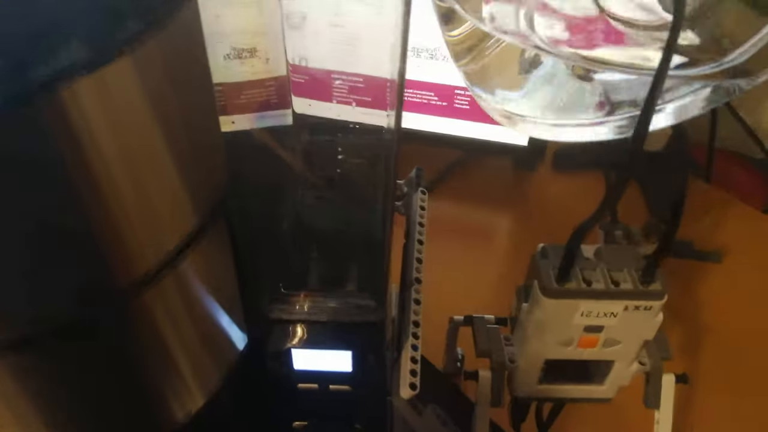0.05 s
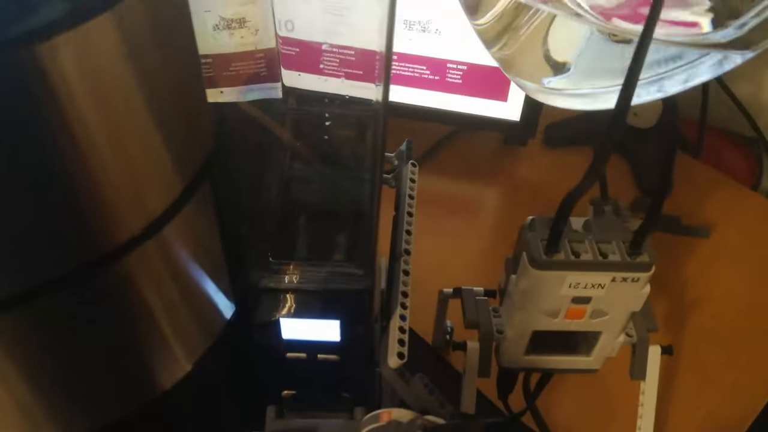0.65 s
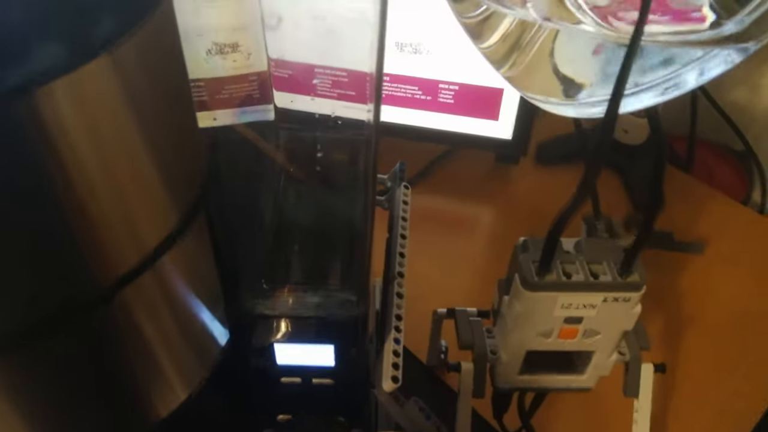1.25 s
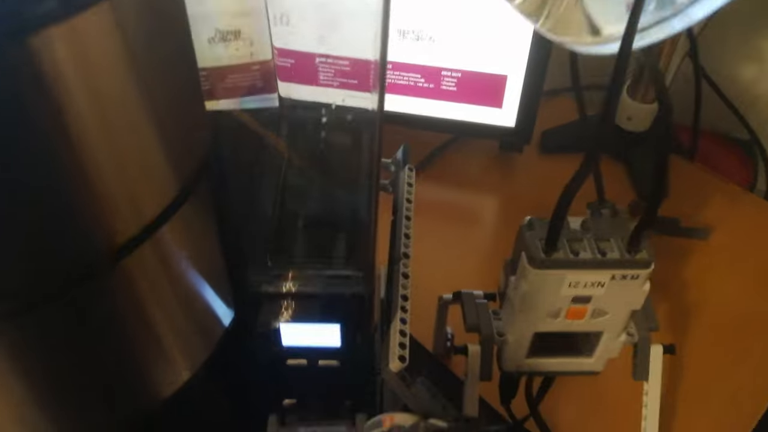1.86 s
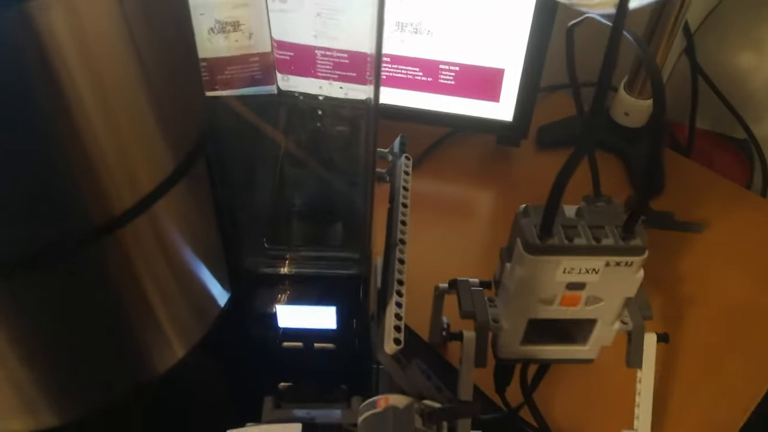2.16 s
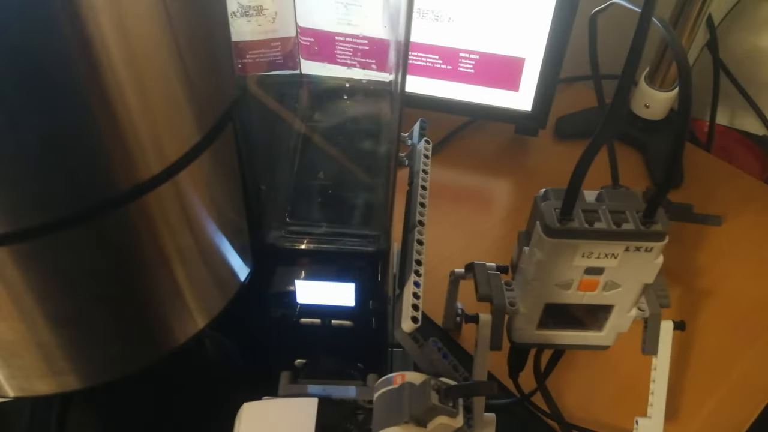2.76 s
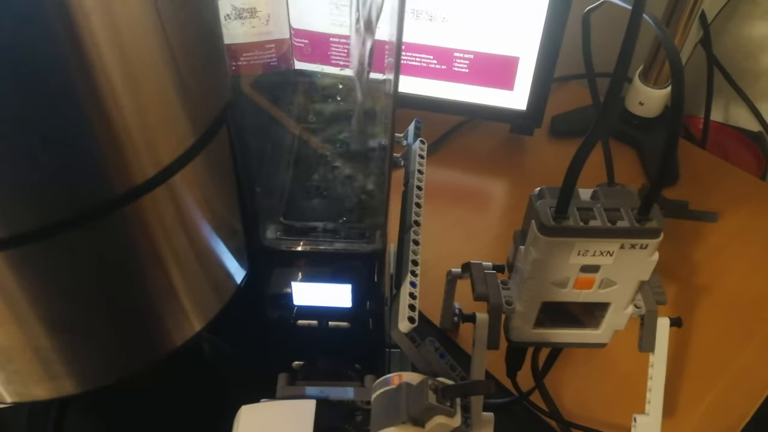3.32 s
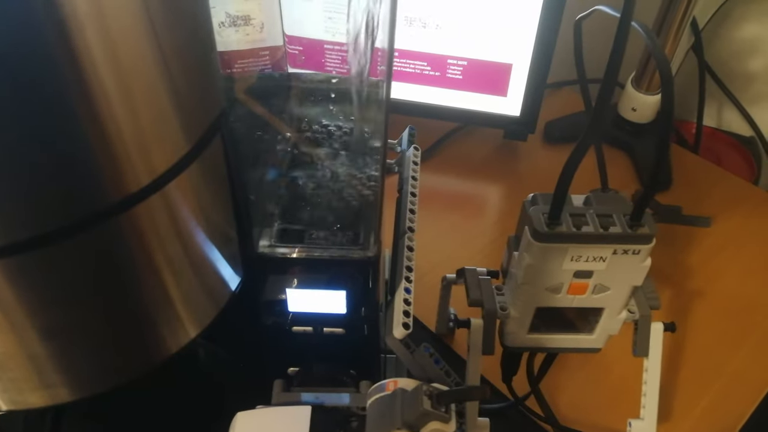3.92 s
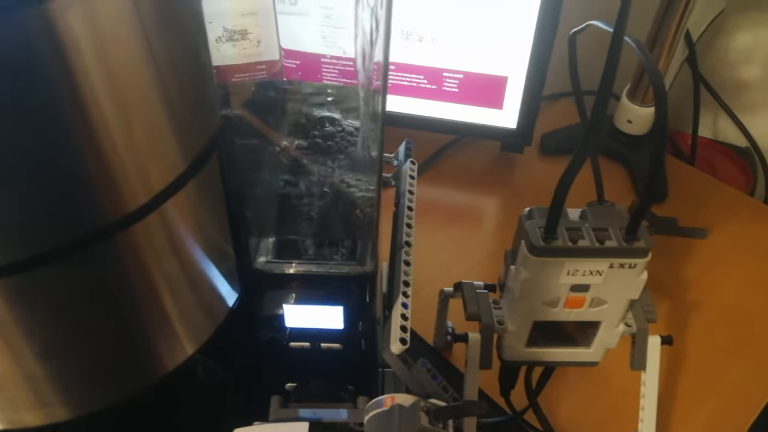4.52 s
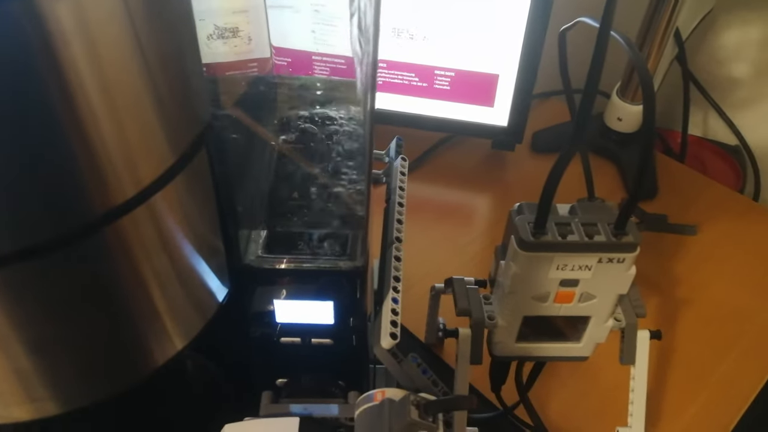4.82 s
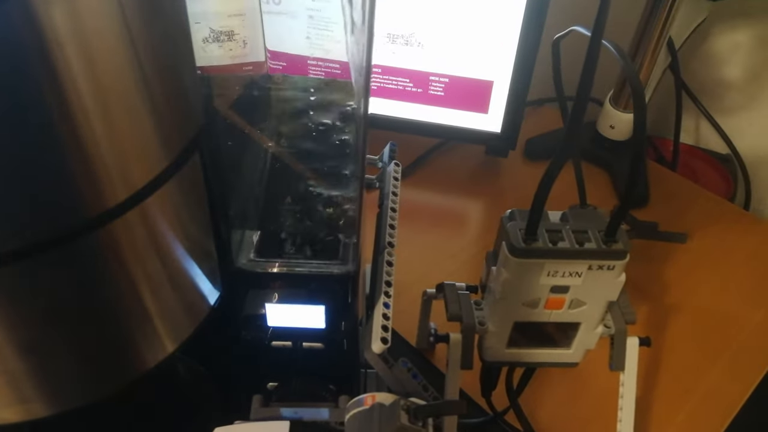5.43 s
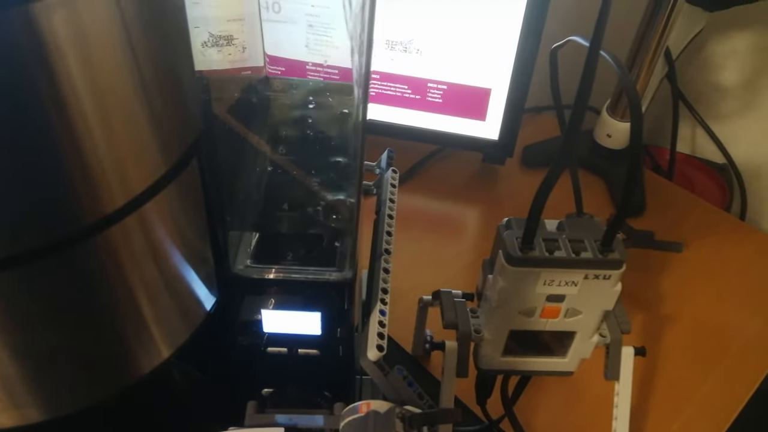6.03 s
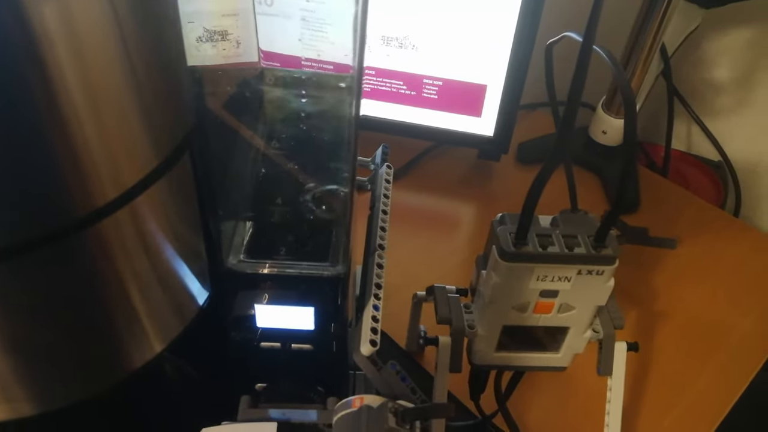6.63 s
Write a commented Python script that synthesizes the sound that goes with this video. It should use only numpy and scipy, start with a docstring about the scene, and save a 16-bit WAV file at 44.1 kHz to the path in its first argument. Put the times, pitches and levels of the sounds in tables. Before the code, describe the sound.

After two hollow knocks, a stream of water splashes into a plastic tank and thins to bubbling drips in a humming room.

```python
"""A stream of water pours into a tall plastic tank on a desk and weakens to gurgles and trickles.
It drags air under, and the bubbles ring inside the tank, a little right of the microphone: big ones
low, small ones high. Before the pour, a jug knocks twice on the tank, there are soft handling bumps
and a brief hiss, and a few drops fall in. Later, foam bursts on the water with tiny clicks.
All along the room hums, and something ticks faintly and evenly."""
import sys
import numpy as np
from scipy import signal
from scipy.fft import rfft, irfft, next_fast_len
from scipy.io import wavfile
from scipy.ndimage import uniform_filter1d, map_coordinates

SR = 44100
rng = np.random.default_rng(int(sys.argv[2]) if len(sys.argv) > 2 else 0)


def store_wav(level_fs):
    """Save 16-bit WAV to argv[1]."""
    pcm = np.round(np.clip(np.atleast_2d(level_fs), -1, 1) * 32767)
    wavfile.write(sys.argv[1], SR, pcm.T.astype(np.int16))


N = 294588

# Levels in the tables are relative. A "colour" says how strong the low and high pitches are.
# A "fade" is the time a sound takes to drop by 60 dB.
# colour of the room's noise: f/Hz, level/dB
ROOM_COLOUR = [(20, 3), (50, -5), (100, -3.5), (170, -3.5), (230, 1), (290, -1.5), (370, -9.5), (520, -9),
               (650, -14), (950, -12.5), (1150, -9.5), (1500, -16), (4500, -18), (8500, -21),
               (11500, -25.5), (15500, -25)]
# how alike that noise is left and right: f/Hz, likeness (1 = the same)
ROOM_LIKENESS = [(60, 0.8), (180, 1), (550, -0.29), (1650, 0.12), (4970, -0.17), (15000, 0.012)]
# tones of the hum: f/Hz, level/dB
HUM_TONES = [(290.7, -77), (737.5, -92.5), (1168, -89)]
# colour of the even ticks: f/Hz, level/dB
TICK_COLOUR = [(4000, -58), (7500, -3), (10000, -5.5), (11500, -17), (15000, -16)]
# the jug hits the tank: t/s, level/dB
KNOCKS = [(0.1273, -32.5), (0.4954, -34.5)]
# tones of the struck tank: f/Hz, width/Hz, level/dB
TANK_TONES = [(242.6, 19.6, -2.5), (491, 44, -9), (819, 69, -16), (1228, 56, -20), (1370, 110, -13.5),
              (1678, 26, -25), (1932, 110, -21), (1974, 9.5, -32), (2460, 21, -28), (2750, 16, -30),
              (2880, 220, -27), (3200, 46, -36), (3480, 44, -45), (3840, 11, -41), (4140, 40, -46)]
# colour of the clack as they touch: f/Hz, level/dB
CLACK_COLOUR = [(100, -44), (220, 1), (370, 3), (650, -17), (1230, -7), (2200, -12), (4000, -27.5),
                (6000, -39), (15000, -51)]
# the room's echo: f/Hz, fade/s
ROOM_FADE = [(200, 0.59), (1500, 0.36), (6000, 0.12), (14000, 0.21)]
# the hiss between the knocks: t/s, level/dB
HISS_LEVEL = [(0.22, -100), (0.29, -71), (0.37, -68.5), (0.45, -69), (0.49, -100)]
# its colour: f/Hz, level/dB
HISS_COLOUR = [(2000, -5), (3200, -5.5), (4000, 0.5), (5000, -5.5), (6200, 1.5), (7000, -4), (8500, 2),
               (11000, -6), (15000, -17)]
# soft handling bumps: t/s, level/dB, f/Hz, fade/s
BUMPS = [(0.4542, -13.5, 168, 0.0057), (0.46, -48, 84.5, .04), (0.92, -52.5, 155, 0.043),
         (1.678, -60, 110, 0.067), (2.019, -55, 140, .04), (2.083, -50, 128, 0.045),
         (4.198, -50, 98, 0.084), (4.479, -53.5, 97, 0.054), (4.895, -41, 116, 0.018)]
# what the desk and hand pass on: f/Hz, level/dB
BUMP_COLOUR = [(20, -34), (50, -10.5), (90, 2.5), (300, 3), (700, 6), (2000, -43), (8000, -70)]
# light handling taps: t/s, level/dB
TAPS = [(0.537, -58.5), (0.926, -61.5)]
# their colour: f/Hz, level/dB
TAP_COLOUR = [(500, 1), (1300, 6), (2500, -4), (4300, 5), (7000, -15), (15000, -22)]
# the clearest drops: t/s, level/dB, bubble f/Hz, splash boost/dB
CLEAR_DROPS = [(2.6446, -39.5, 7860, 8.5), (2.6734, -34.5, 2940, 1), (2.6947, -42, 9550, 0),
               (2.74, -44, 6800, -2), (2.798, -42.5, 7700, -5), (2.8306, -37.5, 9800, -8),
               (2.9066, -40.5, 5800, -4), (2.9336, -30.5, 4036, 7), (2.9611, -29, 6930, 0),
               (3.0088, -32, 4660, 5), (3.0595, -27.5, 4000, -7), (3.125, -26, 6650, -4),
               (3.3355, -27.5, 6850, -9), (3.4146, -32.5, 8000, 1.5), (3.5167, -24, 6590, -5),
               (3.683, -34, 6860, -1.5), (3.7492, -31.5, 6980, -4), (3.899, -33.5, 7350, -8),
               (4.376, -30.5, 8720, -16), (4.5438, -31, 8000, -2), (4.5855, -37.5, 2250, 7),
               (4.8044, -34, 7830, 9.5), (4.8563, -35.5, 3180, 5), (4.9075, -41, 8300, 8),
               (4.9887, -39, 2950, 4), (5.0609, -45.5, 3000, 7), (5.1058, -38.5, 5700, -14),
               (5.2468, -37.5, 5640, 2), (5.3, -37, 13200, -8), (5.3676, -50, 2890, -1),
               (5.447, -42, 7300, 1), (5.6573, -41.5, 6130, 7), (5.7633, -42.5, 3400, -1.5),
               (5.7774, -36, 2104, -8), (5.8391, -34.5, 2060, -8), (5.9484, -43, 7100, 7),
               (5.9803, -35, 3320, -3), (6.0235, -38.5, 5130, 0.5), (6.0977, -43, 5550, -8),
               (6.114, -38.5, 5500, 1.5), (6.1605, -39.5, 3190, -3), (6.2122, -38.5, 9970, 2),
               (6.2879, -38.5, 3320, 2), (6.339, -42.5, 5840, -6), (6.3593, -43, 4383, 0),
               (6.52, -49.5, 4600, -2)]
# echoes between the tank's walls: f/Hz, fade/s
WALL_FADE = [(200, 0.18), (2000, 0.048), (12000, 0.036)]
# strength of the pour, from full stream to trickle: t/s, strength/dB
POUR_STRENGTH = [(2.89, -78), (2.95, -50), (3.06, -42), (3.35, -46), (3.75, -46), (3.8, -54), (4.0, -55),
                 (4.29, -60), (4.41, -51), (4.53, -53), (4.6, -48), (4.76, -50), (4.93, -66), (5.25, -63),
                 (5.56, -76), (5.92, -72), (6.2, -68), (6.45, -79)]
# how big bubbles follow the pour: strength/dB, level/dB
GURGLE_LEVEL = [(-77, -75), (-66.5, -72.5), (-56.5, -62.5), (-44.5, -54.5)]
# how medium bubbles follow it: strength/dB, level/dB
BUBBLE_LEVEL = [(-79.5, -78), (-63.5, -67.5), (-54.5, -53.5), (-44, -45.5)]
# how small bubbles follow it: strength/dB, level/dB
PATTER_LEVEL = [(-80, -80), (-68, -63.5), (-58, -55), (-44, -51)]
# the fine spray: t/s, level/dB
SPRAY_LEVEL = [(2.915, -62), (2.94, -48), (3.06, -54.5), (3.15, -47), (3.35, -52), (3.55, -52), (3.78, -58),
               (4.02, -55.5), (4.24, -71.5), (4.4, -57), (4.48, -49.5), (4.6, -52), (4.68, -56),
               (4.84, -54.5), (5.08, -67.5), (5.24, -60), (5.56, -68), (6.45, -73.5)]
# the stream plunges deep and gurgles: t/s, length/s, level/dB
PLUNGES = [(2.96, 0.042, -51.5), (3.028, 0.015, -52.5), (3.225, 0.046, -47), (4.445, 0.049, -51)]
# lumps of water slap the bottom or the surface: t/s, length/s, level/dB
SLAPS = [(2.932, .025, -45), (3.105, .035, -45), (3.23, .04, -48), (4.805, .012, -54), (5.195, .025, -62),
         (5.248, .02, -57), (5.66, .04, -58), (5.742, .058, -54), (5.834, .012, -54), (6.273, .02, -57),
         (6.64, .03, -63)]
# colour of water in the tank: f/Hz, level/dB
WATER_COLOUR = [(100, -55), (170, -22.5), (210, -1), (350, -6.5), (440, -12.5), (620, -12), (900, -9.5),
                (1180, 0.5), (1400, 1), (1600, -7), (2100, -10.5), (2600, -9.5), (3100, -10), (5500, -18),
                (7000, -14.5), (9300, -17.5), (11000, -29), (15500, -30)]
# pitches that the air in the tank makes louder: f/Hz, width/Hz, boost/dB
AIR_TONES = [(241.4, 22, 5.5), (501.4, 27, 19), (813, 91, 7.5), (1235, 42, 0), (1388, 33, 5),
             (3970, 150, 3.5)]
# big air pockets dragged under: t/s, level/dB, f/Hz
GULPS = [(2.91, -40.5, 1730), (3.013, -34, 1236), (3.043, -35, 321), (3.045, -27.5, 1370),
         (3.104, -38, 1270), (3.429, -26.5, 1390), (3.686, -26.5, 1336), (4.36, -32.5, 1380),
         (4.47, -40, 497), (4.857, -38, 1450), (5.736, -43, 1340)]
# how the tank's sound is shared between the sides: f/Hz, left minus right/dB
TANK_BALANCE = [(100, -0.5), (380, 0), (520, -4), (800, -7.5), (1150, 0.5), (1450, 0.5), (2000, -0.5),
                (3000, -6.5), (4400, -6), (8120, -25.5), (15000, -14)]
# how far the left side lags behind the right: f/Hz, phase/rad
LEFT_LAG = [(100, -4), (240, .5), (360, 0.9), (500, 1.2), (800, 1.5), (1150, 0.99), (1450, 1.34),
            (2000, 1.47), (3000, 4.5), (6800, 8), (15000, 15.5)]

TOP_HZ = 15900


def amp(db):
    """Turn decibels into a number to multiply by."""
    return 10 ** (np.asarray(db) / 20)


def unit(x):
    """Scale a sound so its average power is 1."""
    return x / np.sqrt(np.mean(x ** 2) + 1e-20)


def along(points, hz):
    """Look up a pitch in a table of (f/Hz, value), sliding between its rows."""
    f, v = np.transpose(points)
    return np.interp(np.log(hz + 1), np.log(f + 1), v)


def curve(rows):
    """A level in dB for every sample: silent before the first row, steady after the last."""
    times, levels = np.transpose(rows)
    return np.interp(np.arange(N) / SR, times, levels, left=-140)


def wobble(rate):
    """A smooth curve through `rate` random values a second."""
    return map_coordinates(rng.standard_normal(int(N * rate / SR) + 4), [np.arange(N) * rate / SR])


def add(track, s, sound):
    """Mix a sound into the track at time s."""
    part = track[..., max(0, round(s * SR)):][..., :sound.shape[-1]]
    part += sound[..., :part.shape[-1]]


def filtered(x, response):
    """Multiply each frequency f in the sound by response(f)."""
    size = next_fast_len(x.shape[-1] + SR // 4)
    return irfft(rfft(x, size) * response(np.fft.rfftfreq(size, 1 / SR)), size)[..., :x.shape[-1]]


def coloured(x, level_db, size=8192):
    """Turn each frequency f up or down by level_db(f)."""
    cepstrum = irfft(np.log(amp(level_db(np.fft.rfftfreq(size, 1 / SR)))))
    fold = 1 + np.sign(size // 2 - np.arange(size))  # ring after a sound, never before it
    fold[0] = 1
    return signal.oaconvolve(x, irfft(np.exp(rfft(cepstrum * fold))))[:len(x)]


def echoes(x, fades, low_hz):
    """Many echoes blur into a fading stereo tail, weak below low_hz."""
    hz, t, noise = signal.stft(rng.standard_normal((2, SR // 3)), SR, nperseg=128)
    fading = noise * amp(-60 * t / along(fades, hz)[:, None])
    tail = signal.istft(fading, SR, nperseg=128)[1]
    tail = filtered(tail / np.linalg.norm(tail[0]), lambda f: (1j * f / (low_hz + 1j * f)) ** 2)
    return signal.oaconvolve(x[None], tail, axes=1)[:, :N]


def ping(t, hz, cycles, rise):
    """A tone that fades to 37% in `cycles` swings. A bubble's pitch rises as it nears the surface."""
    age = t * hz / cycles
    return np.sin(2 * np.pi * hz * t * (1 + rise * age)) * np.exp(-age) * (1 - np.exp(-t * hz))


def room():
    """Low indoor rumble and hiss with a slightly wavering hum."""
    def mid_and_side(f):
        width = np.arccos(np.clip(along(ROOM_LIKENESS, f), -1, 1)) / 2
        return amp(along(ROOM_COLOUR, f)) * [np.cos(width), np.sin(width)]
    mid, side = filtered(rng.standard_normal((2, N)), mid_and_side)
    t = np.arange(N) / SR
    hum = sum(amp(db + 2.3 * wobble(3.25)) * np.sin(2 * np.pi * hz * t + 0.36 * wobble(7.4))
              for hz, db in HUM_TONES)
    return amp(-66) * unit(np.array([mid + side, mid - side])) + amp(1.5) * hum


def ticks(first_s=0.0845, gap_s=0.09124):
    """Tiny, even ticks of high noise on the right."""
    out, t = np.zeros(N), np.arange(SR // 30) / SR
    fade = amp(-60 * t / 0.027) + amp(-12.5 - 60 * t / 0.18)
    for s in np.arange(first_s, N / SR, gap_s):
        add(out, s, rng.standard_normal(len(t)) * fade)
    return coloured(out, lambda f: along(TICK_COLOUR, f)) * amp([[-67.5], [-54]])


def knocks():
    """The jug clacks on the tank: the wall bends briefly, then the tank rings hollow."""
    out, t = np.zeros(N), np.arange(SR // 2) / SR
    ring = 0
    for hz, width, db in TANK_TONES:
        tone = np.sin(2 * np.pi * hz * t + rng.uniform(0, 2 * np.pi))
        fade = np.exp(-1.63 * width * t)  # wide tones die fast
        ring += amp(db) * width / TANK_TONES[0][1] * fade * tone
    ring *= 1 - np.exp(-t / 0.0023)
    bend = amp(11.5) * ping(t, 1210, cycles=3.54, rise=0) + amp(-0.5) * ping(t, 373, cycles=2.4, rise=0)
    for s, db in KNOCKS:
        burst = rng.standard_normal(len(t)) * amp(-60 * t / 0.14)
        clack = coloured(burst, lambda f: along(CLACK_COLOUR, f))
        add(out, s, amp(db) * (amp(4) * ring + amp(11) * clack + bend))
    return out + amp(-7.5) * echoes(out, ROOM_FADE, low_hz=390)


def hiss():
    """One short, faint hiss on the right."""
    noise = filtered(rng.standard_normal((2, N)), lambda f: amp(along(HISS_COLOUR, f)))
    return unit(noise) * amp(curve(HISS_LEVEL)) * amp([[-5], [6]])


def bumps(left_lead_s=0.00076):
    """Dull bumps travel through the desk and the hand, reaching the left side first."""
    out, t = np.zeros(N), np.arange(SR // 4) / SR
    for s, db, hz, fade_s in BUMPS:
        add(out, s, amp(db - 60 * t / fade_s) * np.sin(2 * np.pi * hz * t))
    out = coloured(out, lambda f: along(BUMP_COLOUR, f))
    return filtered(out, lambda f: np.exp(1j * np.pi * f * left_lead_s * np.array([[1], [-1]])))


def taps():
    """Small dry taps as the jug is moved."""
    out, t = np.zeros(N), np.arange(SR // 16) / SR
    for s, db in TAPS:
        noise = coloured(rng.standard_normal(len(t)), lambda f: along(TAP_COLOUR, f))
        add(out, s, amp(db - 60 * t / 0.042) * unit(noise))
    return out * amp([[-2], [2]])


def drops():
    """Each drop leaves a ringing bubble in a splash of tiny ones."""
    out, t = np.zeros(N), np.arange(SR // 12) / SR
    fade = (1 - np.exp(-t / 0.00098)) * (amp(-60 * t / 0.023) + amp(-21 - 60 * t / 0.2))
    splash_colour = [(300, -9), (1500, 4.5), (9000, 5), (11000, 0.5), (15000, -2)]  # f/Hz, level/dB
    for s, db, hz, splash_db in list(CLEAR_DROPS) + stray_drops():
        near_pitch = lambda f: -7 * np.abs(np.log2((f + 100) / hz)) + along(splash_colour, f)
        splash = unit(coloured(rng.standard_normal(len(t)), near_pitch)) * fade
        bubble = ping(t, hz, cycles=8.9, rise=0.004)
        add(out, s, amp(db + 0.5) * (bubble + amp(splash_db - 8.5) * splash))
    return out


def stray_drops(full_stream_db=-46, full_per_s=11, hz=6480, splash_db=6):
    """A stronger stream throws more and louder drops. Gives rows like those of CLEAR_DROPS."""
    boost_db = 0.45 * (curve(POUR_STRENGTH) - full_stream_db)
    drops_so_far = np.cumsum(full_per_s * amp(boost_db)) / SR
    count = int(drops_so_far[-1])
    starts = np.searchsorted(drops_so_far, np.arange(1, count) + rng.random(count - 1))
    return [(i / SR, -43.5 + boost_db[i] - 1.5 * softer, hz * np.exp(0.25 * higher), splash_db)
            for i, (softer, higher) in zip(starts, rng.standard_normal((len(starts), 2)))]


def surges(rows, rise_s=0.01, fall_s=0.07):
    """Loudness of brief rushes of water: they swell 30 dB in rise_s, hold, and lose 30 dB in fall_s."""
    gain, t = np.zeros(N), np.arange(-SR // 10, SR // 2) / SR
    for s, length, db in rows:
        away = np.maximum(-t, 0) / rise_s + np.maximum(t - length, 0) / fall_s
        add(gain, s + t[0], amp(db - 30 * away))
    return gain


def bubble_cloud(lo_hz, hi_hz, flow, per_s, cycles, spread_db, wash_db, samples):
    """Random bubbles ring in the tank over a wash of countless tiny ones, at an evened-out level."""
    count = int(per_s * np.sum(flow) / SR)
    starts = rng.choice(N, count, p=flow / np.sum(flow))  # more flow, more bubbles
    hz = lo_hz * (hi_hz / lo_hz) ** rng.random((count, 1))
    strength = hz * amp(spread_db * np.minimum(rng.exponential(size=hz.shape), 3))
    life = cycles * np.exp(0.3 * rng.standard_normal(hz.shape))
    pings = strength * ping(np.arange(samples) / SR, hz, life, rise=0.0027)
    ringing = np.bincount((starts[:, None] + np.arange(samples)).ravel(), pings.ravel(), N + samples)[:N]
    band = lambda f: 1 / (1 + (f / hi_hz) ** 12) / (1 + (lo_hz / (f + 1)) ** 12)
    wash = filtered(rng.standard_normal(N), band)
    water = unit(ringing) + amp(wash_db) * unit(wash * np.sqrt(flow))
    air_db = lambda f: sum(db / (1 + (2 * (f - pitch) / width) ** 2) for pitch, width, db in AIR_TONES)
    water = coloured(water, lambda f: along(WATER_COLOUR, f) + air_db(f))
    power = np.abs(uniform_filter1d(uniform_filter1d(water ** 2, size=2400), size=2400))
    return water / np.sqrt(power + np.mean(power) / 1000)


def stream(lands_s=2.892, cover_s=0.12, flutter_db=1.5):
    """The unsteady stream folds air into the water, making deep gurgles, bubbles, patter and spray."""
    strength_db = curve(POUR_STRENGTH)
    def follow(levels):
        return amp(np.interp(strength_db, *np.transpose(levels), left=-140) + flutter_db * wobble(18))
    # water must cover the bottom before air can be folded under
    covered = np.clip((np.arange(N) / SR - lands_s) / cover_s, 0, 1)
    slap = surges(SLAPS)
    gurgle = covered * np.hypot(follow(GURGLE_LEVEL), surges(PLUNGES))
    bubbles = covered * np.hypot(follow(BUBBLE_LEVEL), amp(-3) * slap)
    patter = np.hypot(follow(PATTER_LEVEL), slap)
    spray_db = curve(SPRAY_LEVEL) - 1.5 + flutter_db * wobble(45)  # spray comes in clusters
    spray = np.hypot(amp(spray_db), amp(-2) * slap)
    flow = np.sqrt(patter / patter.max()) * (strength_db > -139)  # zero before the pour
    # each loudness curve shapes its own size of bubble
    return (
        gurgle * bubble_cloud(177.8, 685, flow, 400, cycles=2.5, spread_db=4, wash_db=-8.5, samples=1800)
        + bubbles * bubble_cloud(695, 1656, flow, 650, cycles=6, spread_db=4.5, wash_db=-6.5, samples=1100)
        + patter * bubble_cloud(1665, 5040, flow, 1600, cycles=4.8, spread_db=5.5, wash_db=-4, samples=560)
        + spray * bubble_cloud(5010, 14840, flow, 1400, cycles=4.8, spread_db=8, wash_db=-4, samples=300))


def gulps():
    """Big air pockets, dragged under by the stream, ring lower than the drops."""
    out, t = np.zeros(N), np.arange(SR // 12) / SR
    for s, db, hz in GULPS:
        add(out, s, amp(db + 1) * ping(t, hz, cycles=4.3, rise=0.0027))
    return out


def foam(from_s=3.4, per_s=10, hz=11800):
    """Tiny foam bubbles burst on the surface with high clicks."""
    out, t = np.zeros(N), np.arange(SR // 100) / SR
    count = int(per_s * (N / SR - from_s))
    for k, (later, louder, higher) in enumerate(rng.standard_normal((count, 3))):
        burst = ping(t, hz * np.exp(0.12 * higher), cycles=15, rise=0.005)
        add(out, from_s + (k + later) / per_s, amp(-49.5 + 1.5 * louder) * burst)
    return out


def in_tank(water):
    """The water is heard directly and as echoes from the tank's walls and the room."""
    direct = filtered(water, lambda f: amp(along([(300, -1.5), (1200, -1), (4000, -3.5)], f)))
    walls = amp(-2) * echoes(water, WALL_FADE, low_hz=1640)
    return direct + walls + amp(-8) * echoes(water, ROOM_FADE, low_hz=203)


def from_right(x):
    """The tank stands to the right, so its sound reaches that side first and brighter."""
    def left_and_right(f):
        ratio = amp(along(TANK_BALANCE, f))
        lead = np.exp(0.5j * along(LEFT_LAG, f))
        return np.array([ratio / lead, lead]) * np.sqrt(2 / (1 + ratio ** 2))
    return filtered(x, left_and_right)


def scene():
    """Knocks, then the pour, over the sound of the room."""
    water = in_tank(stream() + drops() + gulps() + foam())
    return from_right(water + knocks()) + taps() + bumps() + ticks() + hiss() + room()


def record(dry):
    """Keep only the sound below TOP_HZ."""
    return filtered(dry, lambda hz: hz < TOP_HZ)


dry = scene()
out = record(dry)
store_wav(out)
```